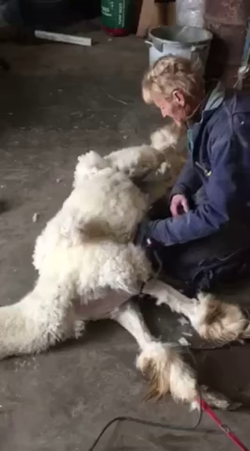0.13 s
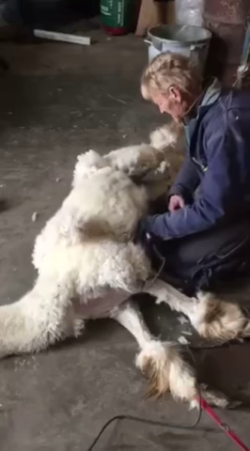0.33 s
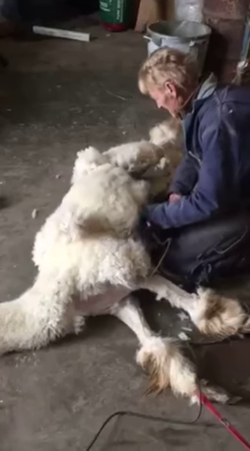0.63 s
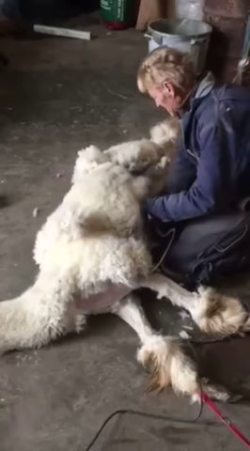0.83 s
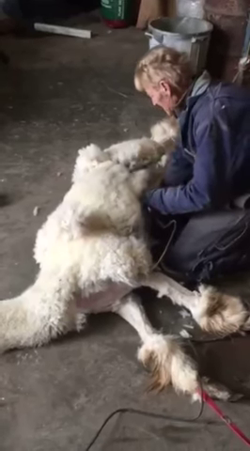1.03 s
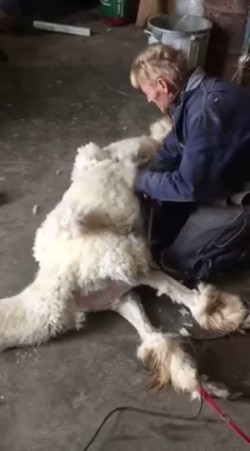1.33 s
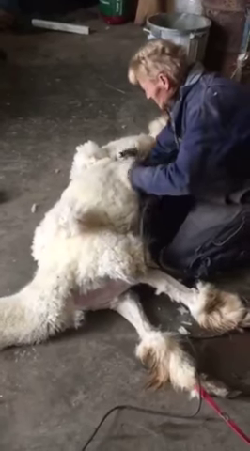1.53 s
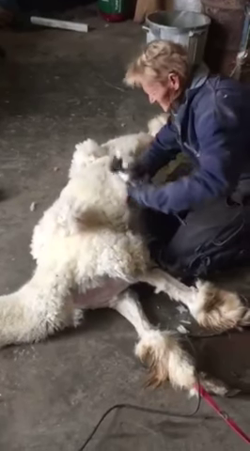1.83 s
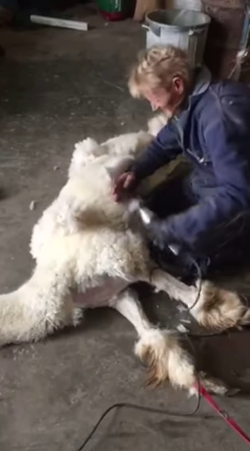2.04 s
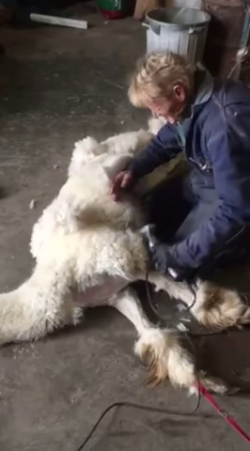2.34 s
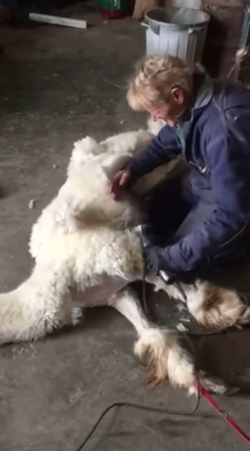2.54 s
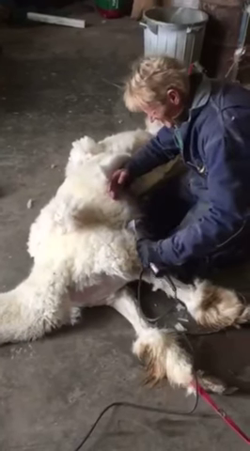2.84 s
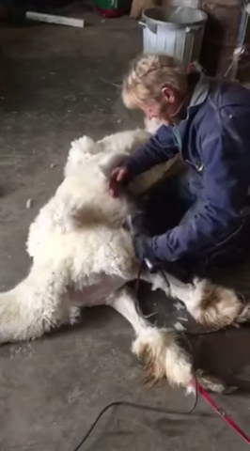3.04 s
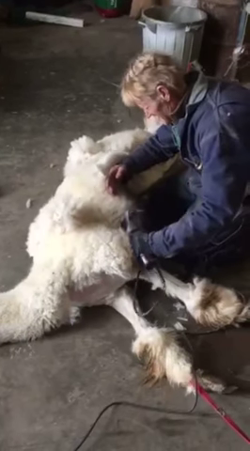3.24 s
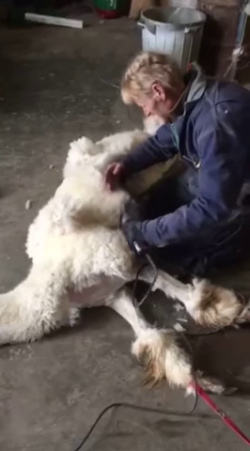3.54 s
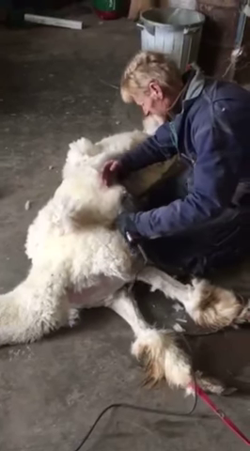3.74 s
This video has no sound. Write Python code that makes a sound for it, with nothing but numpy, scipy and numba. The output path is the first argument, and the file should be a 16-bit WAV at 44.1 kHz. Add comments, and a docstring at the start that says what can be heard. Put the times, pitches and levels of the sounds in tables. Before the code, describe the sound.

Harsh rattling buzz of motorised fleece clippers, muffled in wool, then brighter, then slightly duller.

```python
"""In a shed, electric shears run over a woolly animal lying on a concrete floor, a few metres from a phone.
A fast motor whines and drives a geared crank, which adds a thrum and a hum made of sines and noise.
The blade clacks at each end of its swing and chatters between; both ring broad resonances of the head.
In the fleece the head is muffled and thrums; lifted out it turns bright, and the shed adds a noise tail.
The sound starts after a short silence."""
import sys
import numpy as np
from scipy import signal
from scipy.fft import rfft, irfft
from scipy.io import wavfile
from scipy.ndimage import uniform_filter1d
from numba import njit

SR = 44100
rng = np.random.default_rng(int(sys.argv[2]) if len(sys.argv) > 2 else 0)


def file_out(sig):
    """Save sig as 16-bit WAV at sys.argv[1]."""
    # one column per channel
    cols = np.atleast_2d(sig).T
    # limit, then scale
    lim = np.clip(cols, -1, 1)
    pcm = np.round(lim * 32767).astype(np.int16)
    wavfile.write(sys.argv[1], SR, pcm)


def rack_gain(trim_db):
    """Turn a fader trim in dB into the linear factor to multiply a signal by."""
    fader = np.asarray(trim_db, float)
    return 10 ** (fader / 20)


N = 171549  # length in samples

# Speed of the motor, heard as the pitch of its whine. Each row: time in seconds, whine in Hz.
WHINE_PITCH = [(.15, 7258), (.4, 7236), (.7, 7218), (1.05, 7242), (1.3, 7297), (1.65, 7352), (1.95, 7390),
               (2.2, 7398), (2.5, 7417), (3.0, 7436), (3.4, 7420), (3.65, 7406), (3.88, 7368)]
# Blade clacks in one crank turn. Each row: crank angle in turns, level in dB.
BLADE_CLACKS = [(.0, 0), (.49, -1.5)]
# Loudness and pitch of the cutting head's three bands. Each row: time in seconds, casing level in dB,
# casing centre in Hz, blade level in dB, blade centre in Hz, treble level in dB.
HEAD_BANDS = [(0.14, -38.5, 1326, -31.5, 2760, -40.5), (0.28, -35.5, 1343, -34, 2770, -44),
              (0.67, -37, 1325, -33.5, 3020, -43.5), (0.89, -37, 1360, -34, 2620, -43.5),
              (0.96, -38.5, 1157, -36.5, 2640, -44.5), (1.07, -36, 1334, -37, 2700, -40.5),
              (1.14, -40, 1330, -36, 2840, -42), (1.2, -37, 1340, -33, 2660, -45.5),
              (1.32, -40.5, 1210, -36.5, 2750, -43), (1.48, -39.5, 1384, -38.5, 2640, -40),
              (1.55, -41, 1250, -33.5, 2700, -44), (1.69, -37, 1460, -37.5, 2960, -39),
              (1.8, -34, 1270, -34.5, 2930, -36.5), (1.93, -33, 1280, -32, 2930, -35),
              (2.05, -35.5, 1270, -32, 2980, -36), (2.16, -35, 1333, -32.5, 2950, -35.5),
              (2.31, -35, 1480, -30.5, 3130, -35), (2.4, -37.5, 1250, -29, 3190, -33),
              (2.49, -34, 1335, -30.5, 3100, -35.5), (2.67, -36, 1300, -31, 3050, -37.5),
              (2.73, -34.5, 1276, -33.5, 2910, -41), (3.0, -34.5, 1260, -33, 3000, -38),
              (3.3, -33, 1296, -34, 3000, -41), (3.56, -34.5, 1264, -33, 3030, -37.5),
              (3.65, -32.5, 1390, -33.5, 3190, -44), (3.77, -34.5, 1266, -35, 3180, -41),
              (3.88, -34.5, 1283, -35, 3220, -38)]
# Narrow rings of the blade and comb. Each row: centre in Hz, width in Hz, level in dB.
BLADE_RINGS = [(2426, 230, -6), (2750, 223, -4), (3100, 260, -5), (3550, 260, -5), (3900, 210, -6.5),
               (4336, 380, -6.5)]
# Hollows in the sound while the head is down in the fleece. Each row: time in seconds, low dip in Hz,
# its depth from 0 to 1, high dip in Hz, its depth from 0 to 1.
FLEECE_DIPS = [(.15, 1950, .2, 5050, .75), (.5, 2000, .35, 5050, .75), (.62, 2000, .2, 5000, .4),
               (.78, 2000, .4, 5050, .8), (1.0, 2030, .5, 5050, .8), (1.15, 1950, .2, 4950, .4),
               (1.35, 1900, .4, 4900, .75), (1.75, 1900, .3, 4850, .6), (1.9, 1850, .1, 4850, .1),
               (2.62, 1900, .1, 4900, .1), (2.72, 1880, .7, 4850, .8), (3.0, 1980, .75, 4850, .7),
               (3.35, 1980, .7, 4950, .75), (3.6, 1820, .65, 4700, .7), (3.88, 1950, .5, 4800, .7)]
# Loudness of the motor whine. Each row: time in seconds, level in dB rms.
WHINE_LEVEL = [(0.15, -44.5), (0.26, -38.5), (0.35, -49), (0.41, -42.5), (0.54, -52.5), (0.62, -41),
               (0.85, -53), (0.89, -45.5), (1.06, -54), (1.3, -43), (1.33, -55), (2.0, -40), (2.13, -45),
               (3.48, -44), (3.59, -43), (3.72, -52), (3.86, -48), (3.88, -54)]
# Loudness of the low machine sounds. Each row: time in seconds, then levels in dB of the crank thrum,
# the hum, the cooling air, the motor shaft tone and its octave.
MACHINE_LEVELS = [(0.15, -65, -51, -54, -53, -61), (0.43, -56, -49, -52, -59, -55.5),
                  (0.48, -62, -53, -56, -61, -56.5), (0.68, -56.5, -46, -48, -51.5, -51.5),
                  (0.79, -53, -52.5, -48, -59.5, -57), (1.05, -58.5, -57.5, -53, -64, -53.5),
                  (1.08, -65.5, -55.5, -51, -71.5, -55), (1.35, -66, -67, -50, -58.5, -57),
                  (1.39, -64.5, -69, -52, -63, -54), (1.58, -66, -54, -47, -68, -55.5),
                  (1.62, -73, -62.5, -51, -61, -50.5), (1.82, -68, -60, -52, -61, -62.5),
                  (2.86, -69, -60, -58.5, -54.5, -51), (3.07, -72, -57.5, -59, -57.5, -50),
                  (3.73, -69, -58, -52.5, -58, -52.5), (3.88, -63, -57, -50, -64, -57)]
# Single overtones that come and go as the grip changes. Each row: time in seconds, then levels in dB rms
# of crank multiples 10, 11, 12 and 14.
GRIP_OVERTONES = [(.15, -73, -76, -76, -66), (.6, -76, -66, -75, -70), (.9, -70, -59, -75, -66),
                  (1.25, -69, -57.5, -63, -71), (1.55, -59, -60, -60.5, -72), (1.8, -53, -66, -58.5, -66.5),
                  (2.05, -58, -75, -62, -74), (2.15, -66, -69, -51.5, -61.5), (2.4, -76, -66, -57.5, -62.5),
                  (2.55, -79, -69, -65, -61), (3.0, -75, -73, -69, -59), (3.4, -72.5, -79, -68, -65),
                  (3.88, -64, -74, -62, -68)]
# Tones in the crank's thrum. Each row: multiple of the crank rate, level in dB.
THRUM_TONES = [(1, -9.5), (2, -9.5), (3, -6.5), (4, -11)]
# Tones in the crank's hum. Each row: multiple of the crank rate, level in dB.
HUM_TONES = [(5, -2.5), (6, 4.5), (7, 5), (8, 1.5)]
# Rumble of the running machine, under the thrum. Each row: frequency in Hz, level in dB.
RUMBLE_COLOUR = [(40, -9), (55, -2), (75, -7), (150, -7), (230, -5)]
# Broad wash of the running machine, under the hum. Each row: frequency in Hz, level in dB.
WASH_COLOUR = [(240, -5.5), (330, 6.5), (420, 2.5)]
# Colour of the cooling air. Each row: frequency in Hz, level in dB.
AIR_COLOUR = [(430, -1.7), (600, -0.84), (800, 0.88)]
# Colour of the microphone. Each row: frequency in Hz, gain in dB.
MIC_COLOUR = [(700, 0), (1000, 3.5), (1400, -0.5), (2000, 0.5), (2800, -5), (3600, -3.5), (4400, -1),
              (5200, 0.5), (6200, -0.5), (7000, 2.5)]


def unit(x):
    """Scale a signal to an rms of 1."""
    return x / np.sqrt(np.mean(x ** 2))


def column(table, index):
    """Read a table column as a straight-line curve in time."""
    rows = np.array(table, float)
    return np.interp(np.arange(N) / SR, rows[:, 0], rows[:, index])


@njit
def resonator(x, hz, width):
    """Band-pass with a moving centre and a gain of 1 there, like a ringing part."""
    out, band, low = np.empty(len(x)), 0., 0.
    for i in range(len(x)):
        g, damping = np.tan(np.pi * hz[i] / SR), width / hz[i]
        v = (band + g * (x[i] - low)) / (1 + g * (g + damping))
        band, low = 2 * v - band, low + 2 * g * v
        out[i] = damping * v
    return out


def walk(rate):
    """Random levels held for 1 / rate seconds and smoothed twice; spread near 1."""
    hold = int(SR / rate)
    steps = np.repeat(rng.standard_normal(N // hold + 1), hold)
    return 1.36 * uniform_filter1d(uniform_filter1d(steps, hold), hold)[:N]


def coloured(points):
    """Noise with a (Hz, dB) spectrum that falls 24 dB per octave outside its ends."""
    hz, db = np.array(points, float).T
    f = np.maximum(np.arange(N // 2 + 1) * SR / N, 1.)
    octaves_outside = np.maximum(np.log2(hz[0] / f), 0) + np.maximum(np.log2(f / hz[-1]), 0)
    gain_db = np.interp(np.log(f), np.log(hz), db) - 24 * octaves_outside
    return unit(irfft(rfft(rng.standard_normal(N)) * rack_gain(gain_db), N))


def blade(crank):
    """Clacks at set crank angles, and a chatter of tiny ticks that swells after each clack."""
    jitter_turns, scatter_db = .01, 1.5
    ticks_per_s, tick_spread_db, loudest_tick = 9000, 3.0, 1.6
    burst_turns, burst_db = 0.11, 12
    clacks, burst = np.zeros(N), np.zeros(N)
    turns = np.arange(int(crank[-1]))
    for angle, db in BLADE_CLACKS:
        timing, strength = rng.standard_normal((len(turns), 2)).T
        at = np.searchsorted(crank, turns + angle + jitter_turns * timing).clip(0, N - 1)
        clacks[at] += rack_gain(db + scatter_db * strength.clip(-2, 2))
        burst += rack_gain(db) * np.exp(-((crank - angle) % 1) / burst_turns)
    tick_size = np.minimum(rng.exponential(size=N), loudest_tick)
    present = rng.random(N) < ticks_per_s / SR
    ticks = present * rng.choice([-1, 1], N) * rack_gain(tick_spread_db * tick_size)
    return unit(clacks), unit(ticks * rack_gain(burst_db * burst))


def head_band(clacks, rattle, hz, db, clack_db, hiss_db, width, skirt_db, sign):
    """One resonance rung by clacks, chatter and hiss: a narrow peak on a broad skirt."""
    chatter, knock = rattle
    push = rack_gain(clack_db) * clacks + knock * (chatter + rack_gain(hiss_db) * rng.standard_normal(N))
    broad = resonator(resonator(push, hz, 3.02 * width), hz, 3.02 * width)
    band = unit(resonator(broad, hz, 1. * width) + rack_gain(skirt_db) * broad)
    return sign * rack_gain(db + 0.52 * walk(9)) * band


def head(turn, crank):
    """Blade sounds ring casing, blade and treble, throb once a shaft turn, and clacks ping the comb."""
    clacks, chatter = blade(crank)
    # each shaft turn starts 6 dB up and fades over 0.3 turns
    knock = unit(rack_gain(6 * np.exp(-(turn % 1) / .3)))
    rattle = chatter, knock
    casing_db, casing_hz, blade_db, blade_hz, treble_db = [column(HEAD_BANDS, k) for k in range(1, 6)]
    treble_hz = np.full(N, 6140.)
    # clack and hiss levels are against the chatter; widths are in Hz
    out = head_band(clacks, rattle, casing_hz, casing_db,
                    clack_db=-20, hiss_db=4, width=440, skirt_db=0, sign=1)
    out = out + head_band(clacks, rattle, blade_hz, blade_db,
                          clack_db=-9, hiss_db=-8, width=1250, skirt_db=5, sign=-1)
    out = out + head_band(clacks, rattle, treble_hz, treble_db,
                          clack_db=-10, hiss_db=-6, width=1700, skirt_db=4, sign=1)
    ping_hz = 3550 * (1 + .08 * walk(40))
    ping = resonator(resonator(clacks, ping_hz, 900.), ping_hz, 450.)
    return out + unit(ping) * rack_gain(blade_db - 9)


def hollow(x):
    """Blade and comb rings stand out and wander as the head turns; two moving dips hollow the sound."""
    out = x
    for hz, width, db in BLADE_RINGS:
        out = out + rack_gain(db + 4 * walk(3.98)) * resonator(x, np.full(N, 1. * hz), 1. * width)
    for k, width_hz in enumerate((260., 340.)):
        dip_hz, depth = column(FLEECE_DIPS, 2 * k + 1), column(FLEECE_DIPS, 2 * k + 2).clip(0, 1)
        out = out - depth * resonator(out, dip_hz, width_hz)
    return out


def wavering_sine(phase, db, waver_db):
    """A sine of the given rms level whose loudness wavers; phase is in turns."""
    return np.sqrt(2) * rack_gain(db + waver_db * walk(14)) * np.sin(2 * np.pi * phase)


def crank_hum(crank, orders, noise_colour, noise_db, db):
    """Wavering sines on multiples of the crank rate over lumpy noise."""
    tones = 0
    for order, tone_db in orders:
        phase = round(order) * crank + rng.random()
        tones = tones + rack_gain(tone_db + 2.5 * walk(6.5)) * np.sin(2 * np.pi * phase)
    noise = rack_gain(noise_db + 2.5 * walk(18)) * coloured(noise_colour)
    return unit(unit(tones) + noise) * rack_gain(db)


def motor(turn, crank, bars):
    """Commutator whine, shaft tone and octave, the crank's overtones, thrum and hum, and cooling air."""
    thrum_db, hum_db, air_db, shaft_db, octave_db = [column(MACHINE_LEVELS, k) for k in range(1, 6)]
    out = wavering_sine(bars * turn, column(WHINE_LEVEL, 1), 0.36)
    out = out + wavering_sine(turn, shaft_db, 1.0)
    out = out + wavering_sine(2 * turn, octave_db, .64)
    for k, order in enumerate((10, 11, 12, 14)):
        out = out + wavering_sine(order * crank, column(GRIP_OVERTONES, k + 1), 4.0)
    out = out + crank_hum(crank, THRUM_TONES, RUMBLE_COLOUR, 2, thrum_db)
    out = out + crank_hum(crank, HUM_TONES, WASH_COLOUR, -1, hum_db)
    return out + coloured(AIR_COLOUR) * rack_gain(air_db)


def shed(x):
    """Echoes as a decaying noise tail that changes as the head moves from spot to spot."""
    t60_s, spots = 0.4, 8  # time to fall 60 dB; number of tails blended in turn
    age = np.arange(int(t60_s * SR)) / SR
    place, out = np.linspace(0, spots - 1, N), 0
    for spot in range(spots):
        # the tail waits 6 ms
        tail = rng.standard_normal(len(age)) * rack_gain(-60 * age / t60_s) * (age > .006)
        tail = tail / np.sqrt(np.sum(tail ** 2))
        share = np.cos(np.pi / 2 * np.clip(place - spot, -1, 1))
        out = out + signal.fftconvolve(x * share, tail)[:N]
    return out


def scene():
    """The head sounds straight and through the shed; the motor tones come straight."""
    bars, gear = 18, 8.2  # commutator bars; motor turns per crank turn
    turn = np.cumsum(column(WHINE_PITCH, 1)) / bars / SR
    crank = turn / gear + .3
    near = head(turn, crank)
    shears = hollow(near + rack_gain(-9) * shed(near))
    return (rack_gain(-1.5) * shears + motor(turn, crank, bars))[None]


def band_limit(x):
    """A steep low-pass at the top of the band."""
    return signal.sosfilt(signal.butter(12, 8250, fs=SR, output="sos"), x)


def record(dry):
    """The phone opens after a short silence, colours the sound and cuts the top."""
    start_s, fade_s, top_hz = .1305, 0.00073, 7550
    gate = np.clip((np.arange(N) / SR - start_s) / fade_s, 0, 1)
    hz, db = np.array(MIC_COLOUR, float).T
    mic_db = np.interp(np.arange(N // 2 + 1) * SR / N, hz, db)
    mic = irfft(rfft(dry) * rack_gain(mic_db), N)
    low_pass = signal.cheby1(8, .3, top_hz, fs=SR, output="sos")
    mix = signal.sosfilt(low_pass, mic * gate)
    return band_limit(mix)


dry = scene()
out = record(dry)
file_out(out)
```